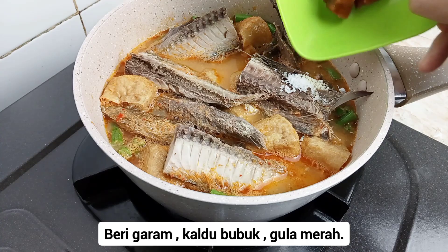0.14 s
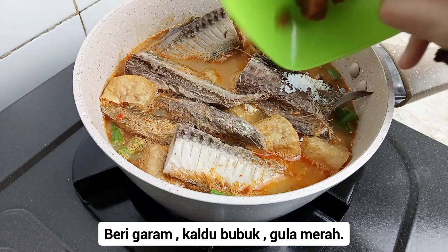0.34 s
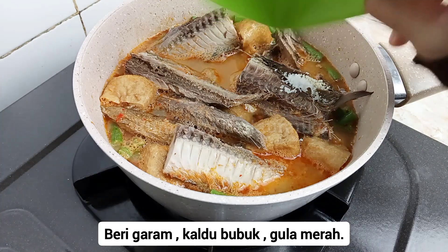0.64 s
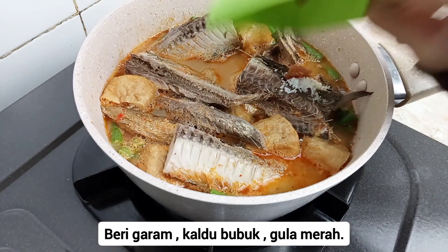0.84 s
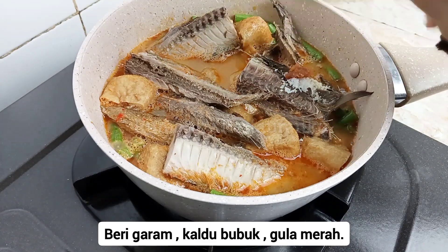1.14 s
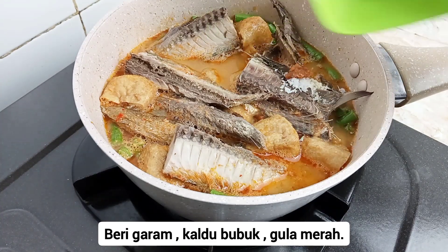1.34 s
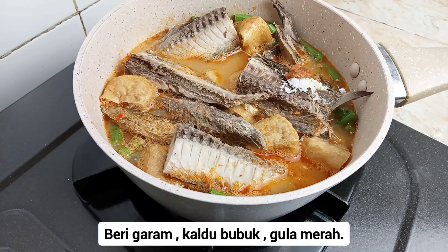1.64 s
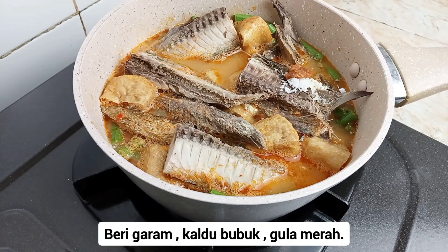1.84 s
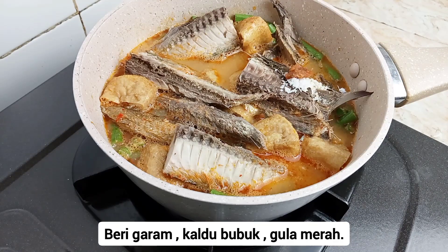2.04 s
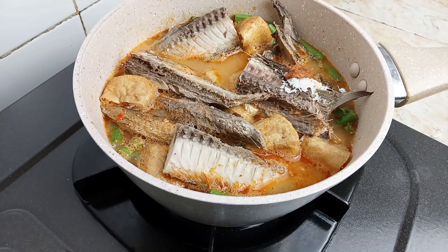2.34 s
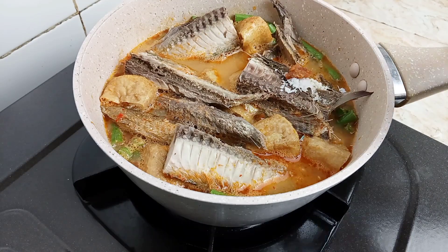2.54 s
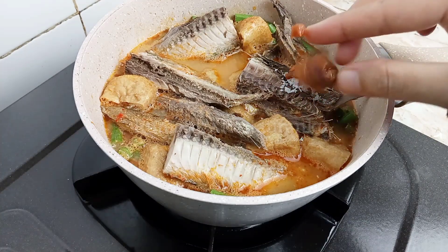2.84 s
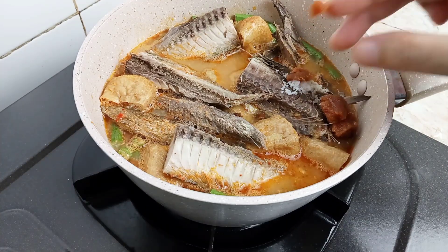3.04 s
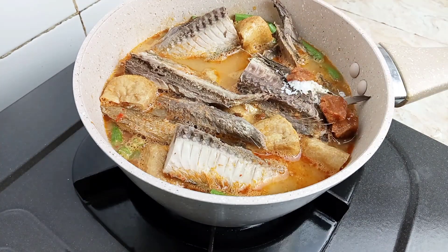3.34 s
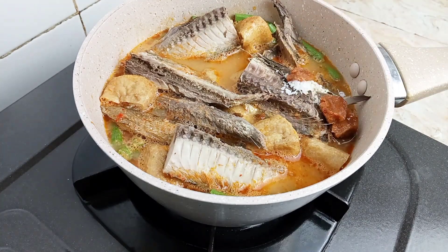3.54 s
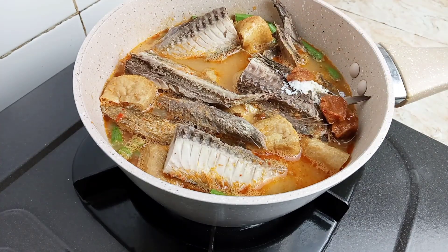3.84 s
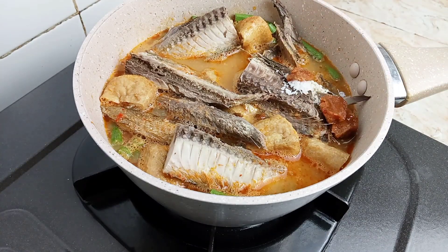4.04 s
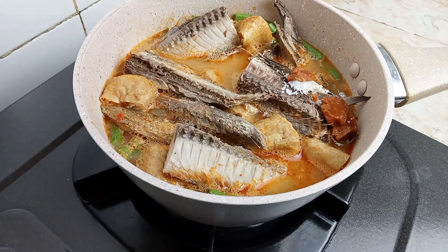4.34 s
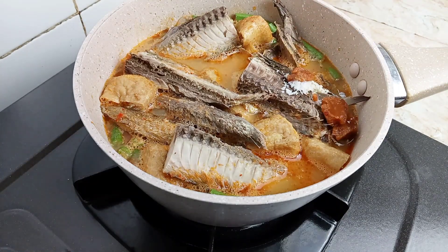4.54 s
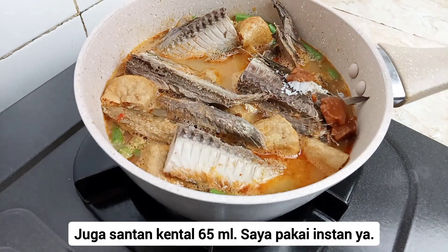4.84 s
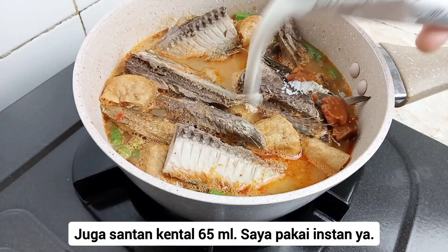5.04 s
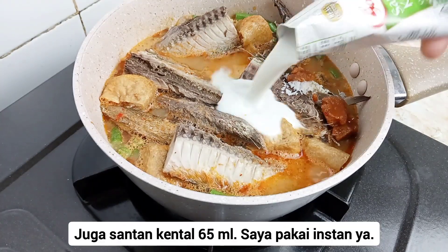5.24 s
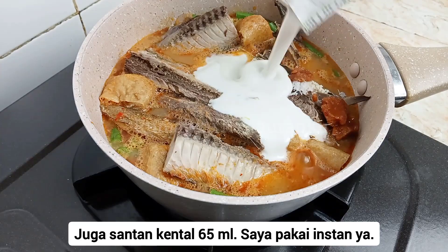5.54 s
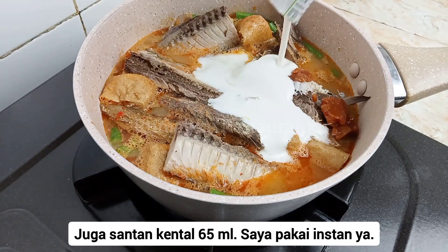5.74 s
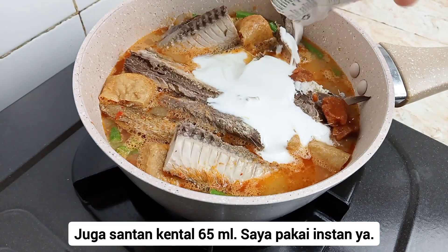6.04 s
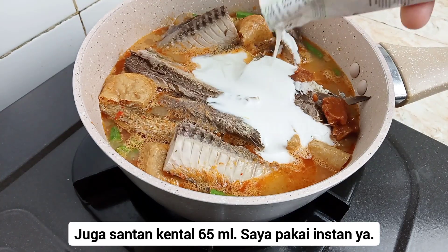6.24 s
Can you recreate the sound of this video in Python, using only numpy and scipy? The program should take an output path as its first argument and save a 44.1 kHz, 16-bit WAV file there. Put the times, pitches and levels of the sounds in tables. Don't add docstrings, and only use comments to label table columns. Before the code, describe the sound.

A phone close to a stove picks up quiet low rumble and soft bubbling. Over it come dry nail flicks, plastic rubs, a dish thudding onto the counter with scraping, sparse sugar lump clicks and a bright hollow rap with quick bounces. After a sudden cut and quick fade-in, stiff card cracks against the pan, followed by papery rubs and tiny ticks, with a short tiled-room tail.

```python
import sys
import numpy as np
from scipy import signal
from scipy.fft import rfft, irfft
from scipy.io import wavfile

SR = 44100
rng = np.random.default_rng(int(sys.argv[2]) if len(sys.argv) > 2 else 0)


def bounce(signal):
    frames = np.transpose(np.atleast_2d(signal))
    limited = np.clip(frames, -1, 1)
    pcm = np.round(limited * 32767).astype(np.int16)
    wavfile.write(sys.argv[1], SR, pcm)


def voltage_ratio(level):
    return 10 ** (np.asarray(level, float) / 20)


N = 281358

# (frequency [Hz], width [Hz])
PORT = [(3550, 420), (7400, 850), (5850, 350)]


def rms_one(x):
    return x / np.sqrt(np.mean(x ** 2) + 1e-20)


def in_time(rows):
    time_s, *columns = np.transpose(rows)
    return [np.interp(np.arange(N) / SR, time_s, column) for column in columns]


def at_hz(points, hz):
    table_hz, value = np.transpose(points)
    return np.interp(np.log(hz), np.log(table_hz), value)


def drift(rate_hz):
    r = np.exp(-80 * np.pi * rate_hz / SR)
    white = rng.standard_normal(N // 40 + 2002)
    slow = signal.lfilter([1], [1, -2 * r, r * r], white)[2000:]
    return np.interp(np.arange(N) / 40, np.arange(len(slow)), rms_one(slow))


def band(x, low_hz, high_hz):
    return signal.sosfilt(signal.butter(2, [low_hz, high_hz], "band", fs=SR, output="sos"), x)


def resonance(x, hz, width_hz):
    r = np.exp(-np.pi * width_hz / SR)
    poles = [1, -2 * r * np.cos(2 * np.pi * hz / SR), r * r]
    return signal.lfilter((1 - r * r) / 2 * np.array([1, 0, -1]), poles, x)


def coloured(spectrum, patchy_db, rate_hz):
    edges_hz = np.geomspace(spectrum[0][0], spectrum[-1][0], 13)
    white = rng.standard_normal((2, N))
    together = drift(rate_hz / 4)
    out = np.zeros(N)
    for k in range(12):
        flicker_db = patchy_db * (0.54 * together + drift(rate_hz))
        out += voltage_ratio(flicker_db) * band(white[k % 2], edges_hz[k], edges_hz[k + 1])
    hz = np.maximum(np.fft.rfftfreq(N, 1 / SR), 1)
    return rms_one(irfft(rfft(out) * voltage_ratio(at_hz(spectrum, hz)), N))


def grains(per_s, spread_db):
    sizes = voltage_ratio(spread_db * np.minimum(rng.exponential(1, N), 4)) * rng.choice([-1, 1], N)
    return rms_one(sizes * (rng.random(N) < per_s / SR))


def add(out, time_s, level_db, hz, t60_s, rise_s=0.00012):
    t = np.arange(round(SR * .15)) / SR
    at = round(time_s * SR)
    envelope = voltage_ratio(level_db - 60 * t / max(t60_s, .001)) * (1 - np.exp(-t / rise_s)) ** 2
    ring = envelope * np.sin(2 * np.pi * hz * t)
    out[at:at + len(t)] += ring[:N - at]


def carton():
    # (frequency [Hz], level [dB], t60 [s])
    carton_modes = [(680, -27, 0.03), (896, -18, 0.12), (1002, -1, 0.026), (1057, -11, 0.069),
                    (1180, 2.5, 0.023), (1370, -13.5, 0.022), (1850, -11, 0.021), (2308, -12.5, 0.015),
                    (3103, -4, 0.018), (2840, -18.5, 0.01), (4030, -21, 0.007), (6600, -21.5, 0.0079),
                    (7510, -26.5, 0.0096)]
    blow_s, blow_db = 5.3037, -8.5
    t = np.maximum(np.arange(N) / SR - blow_s, 0)
    crack = rng.standard_normal(N) * (t > 0) * voltage_ratio(np.maximum(-60 * t / 0.14, -200))
    out = voltage_ratio(blow_db - 16.5) * band(crack, 1800, 2500)
    out += voltage_ratio(blow_db - 38.5) * band(band(crack, 5600, 9500), 5000, 7200)
    for hz, mode_db, t60_s in carton_modes:
        add(out, blow_s, blow_db + mode_db, hz, t60_s, rise_s=0.00046)
    out = signal.sosfilt(signal.butter(2, 450, "high", fs=SR, output="sos"), out)
    out = out - .85 * resonance(out, 1580, 220) - .6 * resonance(out, 5250, 900)
    add(out, blow_s, blow_db - 39, 230, .05, rise_s=0.0016)
    return out


def thud():
    contact_s, peak_db, contact_hz = 1.6374, -19.5, 553
    phase = np.pi * contact_hz * (np.arange(N) / SR - contact_s)
    out = voltage_ratio(peak_db) * (1 - 2 * phase ** 2) * np.exp(-phase ** 2)
    for hz, mode_db, t60_s in [(251, -13.5, 0.016), (516, -17.0, 0.027), (834, -27, 0.022), (1250, -6.5, 0.012)]:
        add(out, contact_s, peak_db + mode_db, hz, t60_s, rise_s=0.00046)
    return out


def knocks():
    # (time [s], level [dB], ring [Hz], t60 [s])
    hollow_knocks = [(0.825, -62, 490, 0.036), (3.011, -60, 746, 0.02), (4.538, -44, 865, 0.038),
                     (4.578, -59, 940, 0.015)]
    # (time [s], level [dB], ring [Hz], t60 [s])
    hard_raps = [(0.956, -52, 2380, 0.011), (0.955, -55, 1420, 0.0087), (1.335, -36, 1950, 0.006),
                 (1.969, -49, 1850, 0.012), (1.6152, -40.5, 1830, 0.013), (1.624, -45, 1300, 0.004),
                 (1.681, -26.5, 1660, 0.0055), (1.8254, -48, 1430, 0.015), (2.1393, -59.5, 1470, 0.017),
                 (3.5992, -50.5, 1770, 0.009), (3.8764, -15, 1522, 0.012), (3.8765, -46, 2360, 0.018),
                 (3.8868, -30.5, 1500, 0.0089), (3.924, -41, 1480, 0.01), (3.8985, -40.5, 1710, 0.014),
                 (3.91, -29.5, 1460, 0.0098), (3.9527, -34, 1540, 0.012), (4.58, -48.5, 2100, 0.0074),
                 (5.903, -57.5, 2237, 0.012), (5.907, -51, 1370, 0.0083)]
    # (time [s], level [dB], ring [Hz], t60 [s])
    nail_flicks = [
        (0.3566, -50.5, 3460, 0.0099),
        (0.365, -53, 3350, 0.013),
        (0.3744, -56, 3530, 0.011),
        (0.3874, -59, 3540, 0.011),
        (0.416, -56, 3500, 0.011),
    ]
    # (time [s], level [dB], ring [Hz], t60 [s])
    large_bubbles = [(0.601, -68, 245, 0.18), (1.019, -71, 156, 0.034), (1.036, -61.5, 210, 0.033),
                     (1.367, -68, 297, 0.13), (2.0, -63.5, 295, 0.15), (2.992, -61, 236, 0.056),
                     (3.04, -63, 267, 0.14)]
    out = np.zeros(N)
    for time_s, level_db, hz, t60_s in [*hollow_knocks, *hard_raps, *nail_flicks, *large_bubbles]:
        add(out, time_s - .0003, level_db + 11.0, hz, t60_s, rise_s=0.001)
        add(out, time_s - .0003, level_db, hz * 1.131, t60_s * 1.36, rise_s=0.00096)
    return out


def ticks():
    # (time [s], level [dB], dull part [dB], fine part [dB])
    dish_ticks = [(.0832, -59.5, -60, -67), (.3561, -42, -68, -56), (.4105, -56, -58, -78),
                  (.4589, -54, -59, -74), (.5362, -55.5, -73, -83), (.6674, -62, -73, -90),
                  (.823, -52.5, -57.5, -52), (.268, -76, -80, -76), (1.0, -69, -78, -85),
                  (.9554, -61, -56.5, -79), (1.2436, -55, -83, -86), (1.5903, -59, -48.5, -62),
                  (1.6187, -64, -63.5, -70), (1.6364, -45, -39.5, -38), (1.6806, -52, -45, -73),
                  (1.7525, -64, -70, -72), (1.8282, -66, -62, -69), (1.932, -58, -67, -56),
                  (2.142, -78, -62, -88), (1.8104, -64, -70, -62), (1.8987, -58, -72, -63),
                  (2.0663, -64, -72, -78), (1.852, -51, -61, -66), (1.954, -61, -56, -74)]
    # (time [s], level [dB], dull part [dB], fine part [dB])
    sugar_ticks = [(2.3989, -51, -60, -88), (2.5974, -73, -76, -65), (2.7292, -69, -73, -61),
                   (2.9557, -74, -74, -66), (3.0126, -47.5, -51, -55), (3.0465, -49, -63, -83),
                   (3.0829, -57, -64, -84), (3.18, -60, -74, -67), (3.3169, -66, -81, -84),
                   (3.5698, -52, -74, -64), (3.6017, -54.5, -51.5, -63), (3.8751, -42, -49.5, -47),
                   (3.8997, -45, -42.5, -49), (3.908, -42.5, -43, -56), (3.9524, -62, -45.5, -61),
                   (4.0751, -64, -76, -75)]
    # (time [s], level [dB], dull part [dB], fine part [dB])
    carton_ticks = [(4.2981, -56, -69, -74), (4.3854, -60, -63, -83), (4.5366, -64, -50.5, -67),
                    (4.579, -68, -52, -78), (4.6199, -54.5, -52, -59), (4.8673, -63, -69, -61.5),
                    (4.9332, -66, -65, -65), (5.257, -53, -75, -87.5), (5.4909, -65, -56, -87),
                    (5.5957, -68, -65, -69), (5.6226, -66.5, -78, -64.5), (5.6955, -67.5, -71.5, -83.5),
                    (5.8172, -66.5, -75, -87.5), (5.899, -65.5, -69, -66), (5.9424, -56.5, -74, -71),
                    (6.0312, -63, -72, -66), (6.2981, -64, -67, -71), (5.8623, -73.5, -75.5, -72),
                    (5.922, -61.5, -58, -72), (5.9491, -68, -66, -64), (6.046, -66, -72, -65),
                    (6.055, -63, -62, -76), (6.1082, -58, -58, -66), (6.192, -62, -71, -73),
                    (6.2614, -71.5, -72, -77.5), (6.311, -71, -73, -68)]
    # (time [s], level [dB], dull part [dB], fine part [dB])
    nail_ticks = [(.9413, -56.5, -57.5, -83), (1.2436, -61, -75, -82), (1.333, -72, -51.5, -84),
                  (3.0135, -55, -72, -80), (3.1687, -49, -52.5, -68), (3.7858, -69.5, -74, -84),
                  (3.877, -50, -69, -78), (4.0592, -69, -44, -79.5), (5.258, -66, -71, -86)]
    # (ticks, ring [Hz], t60 [s])
    ticking = [(dish_ticks, 7670, 0.01), (sugar_ticks, 7500, 0.015),
               (carton_ticks, 7250, 0.029), (nail_ticks, 5300, 0.0089)]
    out = np.zeros(N)
    t = np.arange(round(SR * .06)) / SR
    for table, ring_hz, t60_s in ticking:
        for time_s, ring_db, dull_db, fine_db in table:
            noise = rng.standard_normal(len(t))
            puff = noise * voltage_ratio(-60 * t / max(t60_s, .002)) * (1 - np.exp(-t / 0.00023))
            hz = ring_hz * (1 + 0.012 * noise[0])
            ring = resonance(resonance(puff, hz, 1000), hz, 1600)
            dull = band(resonance(puff, PORT[0][0], 800), 1600, 4000)
            fine = band(band(puff, 9500, 15500), 8000, 18000)
            at = round(time_s * SR)
            for peak_db, part in [(ring_db, ring), (dull_db, dull), (fine_db, fine)]:
                out[at:at + len(t)] += (voltage_ratio(peak_db) * part / abs(part).max())[:N - at]
    return out


def pressure(strokes):
    t = np.arange(0, N + 32, 32) / SR
    out = np.full((2, len(t)), -200.)
    for peak_s, swell_s, fade_s, *peak_db in strokes:
        away = np.maximum((peak_s - t) / max(swell_s, .001), (t - peak_s) / max(fade_s, .001))
        out = np.maximum(out, np.c_[peak_db] - 30.5 * away)
    return [np.interp(np.arange(N) / SR, t, level_db) for level_db in out]


def rubs():
    # (peak time [s], swell [s], fade [s], body [dB], scratch [dB])
    dish_rubs = [(0.51, .02, 0.056, -66, -67), (0.438, 0.08, .09, -58, -76), (.5, .06, .12, -62, -100),
                 (.57, 0.064, 0.046, -65.5, -100), (1.37, 0.11, 0.13, -62.5, -97),
                 (1.7, 0.058, .1, -59, -92), (1.835, .02, 0.096, -67, -95), (0.92, 0.088, 0.054, -74, -93),
                 (2.89, 0.074, 0.23, -60, -102), (3.012, 0.039, 0.1, -71, -68)]
    # (peak time [s], swell [s], fade [s], body [dB], scratch [dB])
    counter_rubs = [(1.62, 0.0065, 0.041, -40, -49.5), (1.634, .01, 0.066, -45, -53.5),
                    (1.718, 0.25, 0.074, -56, -57.5), (1.8, 0.13, 0.036, -62.5, -68),
                    (1.83, 0.015, 0.11, -51.5, -52), (1.858, 0.12, .02, -53.5, -58),
                    (1.942, 0.14, 0.44, -61.5, -65), (2.006, 0.2, 0.12, -55, -65),
                    (2.09, 0.14, 0.027, -72, -69), (3.798, 0.05, 0.076, -56, -86),
                    (3.94, .06, 0.09, -68, -90), (4.07, 0.031, 0.058, -66, -67)]
    # (peak time [s], swell [s], fade [s], body [dB], scratch [dB])
    carton_rubs = [(4.302, .03, .08, -75, -76), (4.382, 0.086, .06, -76, -74.5),
                   (4.458, 0.18, 0.071, -97, -67), (4.6, 0.057, 0.15, -73, -74),
                   (4.74, 0.078, 0.12, -66, -76), (4.98, 0.087, 0.066, -96, -80.5),
                   (5.36, .04, .3, -92, -76), (5.902, 0.0057, 0.053, -65, -69.5),
                   (5.92, 0.033, .03, -72, -69), (5.956, 0.073, 0.16, -72.5, -66),
                   (6.04, 0.027, 0.14, -73, -64.5), (6.128, 0.12, 0.03, -61.5, -55),
                   (6.075, .03, .05, -76, -70), (6.2, 0.31, 0.043, -70.5, -67.5),
                   (6.284, 0.086, 0.11, -63.5, -83)]
    # (peak time [s], swell [s], fade [s], body [dB], scratch [dB])
    finger_rubs = [(.09, .03, 0.054, -88, -88), (.215, 0.017, 0.039, -90, -85), (.68, .03, .06, -92, -94),
                   (.77, 0.033, 0.036, -92, -84), (1.12, 0.032, 0.079, -73, -87),
                   (1.48, .04, 0.033, -77, -93), (3.05, 0.07, 0.078, -92, -87),
                   (3.79, .03, .08, -91.5, -89.5), (4.83, .03, .05, -87.5, -85),
                   (4.94, .02, 0.12, -92, -82), (5.0, .08, 0.034, -86, -79.5),
                   (5.21, 0.16, 0.1, -78, -84.5), (5.26, 0.17, 0.057, -83, -79),
                   (5.53, 0.082, 0.076, -85, -84), (5.83, .05, 0.094, -90, -90)]
    # (peak time [s], swell [s], fade [s], body [dB], scratch [dB])
    dish_base_rubs = [(.456, 0.051, .12, -61.5, -105), (1.32, 0.023, 0.26, -59, -88),
                      (1.35, .05, 0.15, -65, -88), (1.41, 0.08, .06, -66.5, -95)]
    # (peak time [s], swell [s], fade [s], body [dB], scratch [dB])
    sleeve_rubs = [(1.815, 0.054, .05, -90, -79), (4.26, .04, 0.052, -92, -89), (4.63, .04, .06, -90, -90),
                   (6.19, 0.082, .06, -89.5, -83)]
    # (strokes, body [Hz], pitch spread [ln], raw slip share [0-1], rustle and fine re scratch [dB])
    rubbed = [(dish_rubs, 1110, 0.2, .7, 1, -2), (counter_rubs, 1495, .35, 0.48, -8, -11.5),
              (carton_rubs, 1160, 0.35, 0.98, -8.5, -15.5), (finger_rubs, 2300, .45, .7, 4, -1.13),
              (dish_base_rubs, 850, .2, .7, -3, -9), (sleeve_rubs, 1500, .45, .7, 1.5, 6.9)]
    slips = grains(5000, spread_db=2.8) * voltage_ratio(2 * np.clip(drift(51), -2, 1.5))
    modes_hz = np.geomspace(750, 2200, 12)
    modes = [(-1) ** k * resonance(slips, hz, 0.036 * hz) for k, hz in enumerate(modes_hz)]
    walls = 0.2 * band(slips, 450, 2600)
    ringing = band(resonance(slips, 3450, 380), 2400, 3800)
    raw = band(slips, 2000, 3560)
    rustle = 1.5 * resonance(resonance(slips, *PORT[1]), 7400, 1500) - .25 * resonance(slips, *PORT[2])
    rustle = rms_one(band(rustle, 5600, 9000))
    fine = rms_one(band(slips, 10000, 19000) + 1.5 * resonance(slips, 14000, 1500))
    out = voltage_ratio(-92.5) * (rms_one(raw) + rustle + fine)
    for strokes, body_hz, spread, raw_share, rustle_db, fine_db in rubbed:
        scratch = rms_one(ringing + raw_share * raw)
        scratch = scratch + voltage_ratio(rustle_db) * rustle + voltage_ratio(fine_db) * fine
        answer = np.exp(-(np.log(body_hz / modes_hz) / spread) ** 2)
        body = rms_one(walls + answer @ modes)
        body_db, scratch_db = pressure(strokes)
        out = out + voltage_ratio(body_db) * body + voltage_ratio(scratch_db) * scratch
    return out


def bubbles():
    bursts = grains(28, spread_db=-1.0)
    dealt = rng.integers(0, 10, N)
    out = np.zeros(N)
    for k, hz in enumerate(np.geomspace(205, 310, 10)):
        out += resonance(resonance(bursts * (dealt == k) + 1e-18, hz, 30), hz, 50)
    return rms_one(out)


def simmer():
    # (frequency [Hz], density [dB/Hz])
    air_spectrum = [(15, -58.5), (25, -15.5), (53, -16.5), (77, 0), (150, -2.5), (185, -9), (240, -5),
                    (394, -12.5), (704, -16), (768, -15), (893, -16.5), (1600, -21.5), (3540, -25),
                    (4300, -37.5), (5590, -57), (9460, -120)]
    # (frequency [Hz], density [dB/Hz])
    hiss_spectrum = [(2530, -41.5), (4300, 0.5), (4770, 0), (5820, 1), (6980, 2.5), (7490, 5.5),
                     (8690, 0.5), (11900, -7), (14200, -6.5), (14900, -1), (16000, -12)]
    # (time [s], level [dB])
    vigour_table = [(0, -3.5), (.63, 3.5), (1.15, 0), (1.6, 0.5), (1.85, 4.5), (2.11, -1.5), (2.71, 0),
                    (3.01, 3.5), (3.36, 1.5), (3.85, 4.5), (3.92, 14.5), (4.1, 5.5), (4.4, -2.5),
                    (4.55, 2.5), (5.17, -3), (5.43, 7), (5.7, -0.5), (6.38, 1.5)]
    vigour_db, = in_time(vigour_table)
    air = coloured(air_spectrum, patchy_db=2.0, rate_hz=9.3)
    low = signal.sosfiltfilt(signal.butter(2, 400, fs=SR, output="sos"), air)
    hiss = coloured(hiss_spectrum, patchy_db=1.8, rate_hz=12)
    rumble = rms_one(low) + voltage_ratio(-9.5) * bubbles()
    murmur = rms_one(air - low)
    out = voltage_ratio(-69 + 0.93 * vigour_db) * rumble
    out += voltage_ratio(-71.5 + 0.78 * vigour_db) * murmur
    return out + voltage_ratio(-88.5 + 0.83 * vigour_db) * hiss


def spits():
    t = np.arange(round(SR * .02)) / SR
    puff = rng.standard_normal(len(t)) * voltage_ratio(-60 * t / 0.014)
    specks = signal.fftconvolve(grains(25, spread_db=2.5), puff)[:N]
    return voltage_ratio(-99) * rms_one(band(specks, 5900, 16000))


def kitchen(x):
    # (frequency [Hz], t60 [s])
    room_t60 = [(250, 0.59), (1000, 0.47), (2000, 0.46), (4000, 0.22), (8000, 0.25)]
    t = np.arange(round(SR * .6)) / SR
    echo = np.zeros(len(t))
    for hz in 125 * 2. ** np.arange(7):
        noise = band(rng.standard_normal(len(t)), hz / np.sqrt(2), hz * np.sqrt(2))
        echo += noise * voltage_ratio(-60 * t / at_hz(room_t60, hz))
    early = 1 + voltage_ratio(4.5 - 60 * t / 0.26)
    echo = echo * np.clip((t - .003) / 0.0013, 0, 1) * early
    return signal.fftconvolve(x, echo / np.sqrt(np.sum(echo ** 2)))[:N]


def scene():
    blow, push, hollow, near = carton(), thud(), knocks(), ticks()
    struck = near + hollow + push + blow
    wall_delay_s, wall_db = 0.0087, -19
    echo = voltage_ratio(wall_db) * np.roll(band(struck, 300, 4600), round(wall_delay_s * SR))
    wet = kitchen(voltage_ratio(-10) * near + voltage_ratio(-16.0) * hollow + voltage_ratio(-15.0) * push + voltage_ratio(-7.5) * blow)
    handled = struck + echo + wet + rubs()
    handled = handled - 0.58 * resonance(handled, 4860, 1200)
    return (handled + simmer() + spits())[None]


def top_cut(x):
    return signal.sosfilt(signal.butter(12, 16400, fs=SR, output="sos"), x)


def record(dry):
    # (time [s], level [dB])
    change_gain = [
        (0, 0),
        (4.1225, -0.5),
        (4.1245, -29),
        (4.17, -17),
        (4.25, -7),
        (4.32, 1.5),
        (4.42, 2),
        (6.4, 3),
    ]
    x = signal.sosfilt(signal.butter(4, 24, "high", fs=SR, output="sos"), dry)
    x = signal.sosfilt(signal.ellip(10, .5, 70, 15600, fs=SR, output="sos"), x)
    x = .9 * np.tanh(x / .9)
    gain_db, = in_time(change_gain)
    return top_cut(x * voltage_ratio(gain_db))


dry = scene()
out = record(dry)
bounce(out)
```